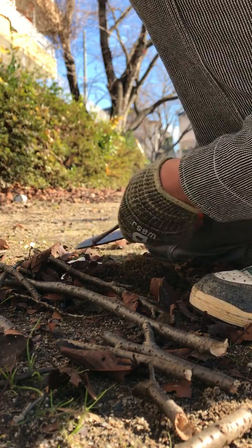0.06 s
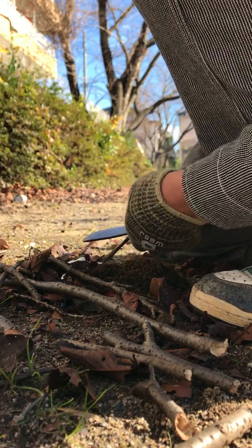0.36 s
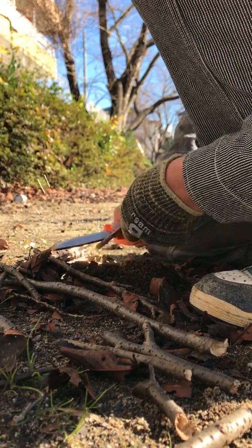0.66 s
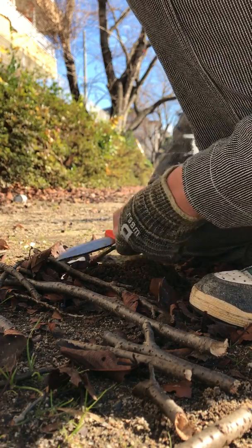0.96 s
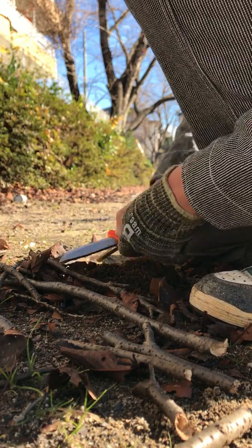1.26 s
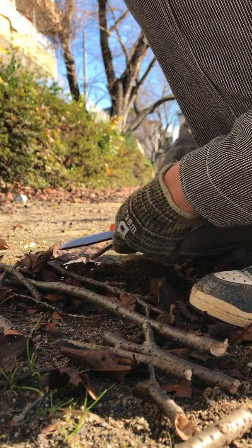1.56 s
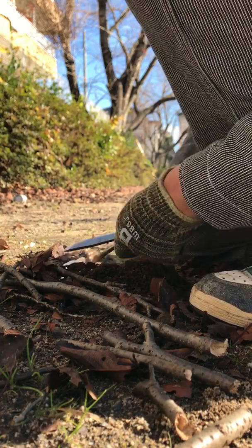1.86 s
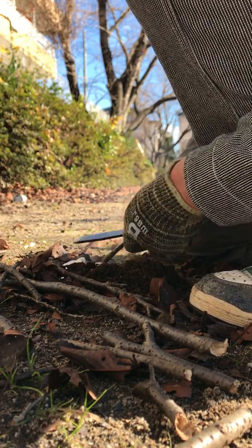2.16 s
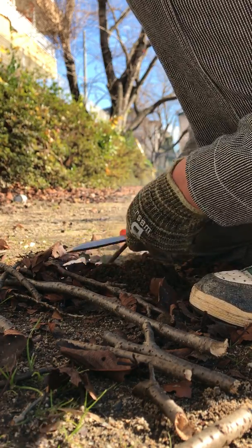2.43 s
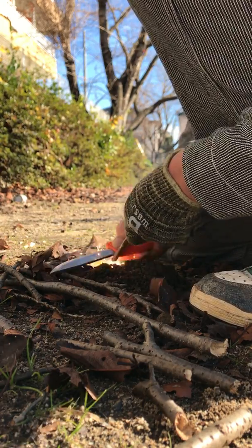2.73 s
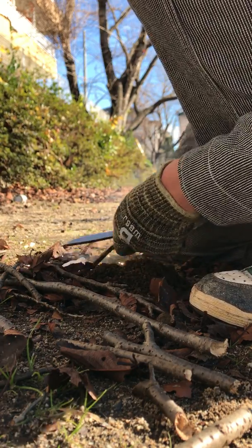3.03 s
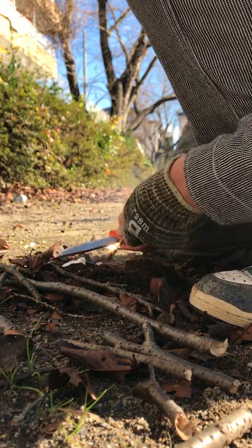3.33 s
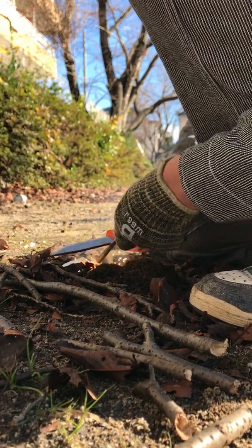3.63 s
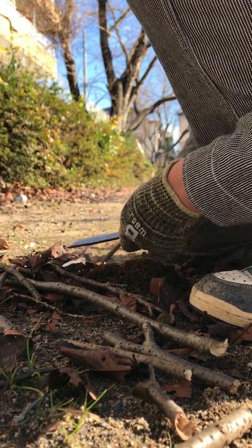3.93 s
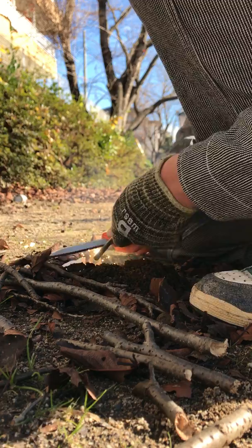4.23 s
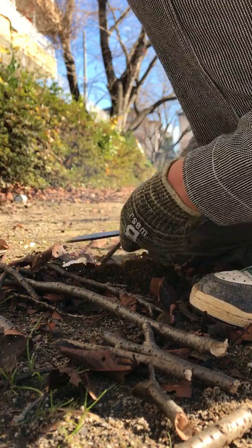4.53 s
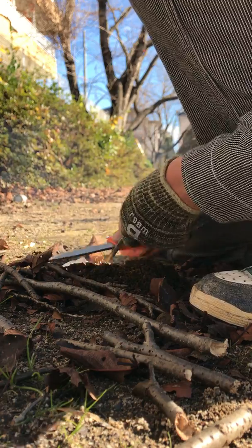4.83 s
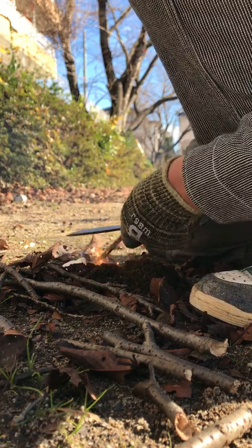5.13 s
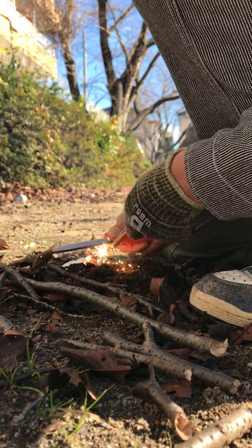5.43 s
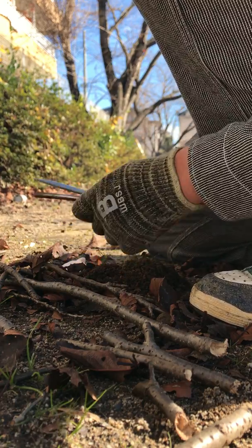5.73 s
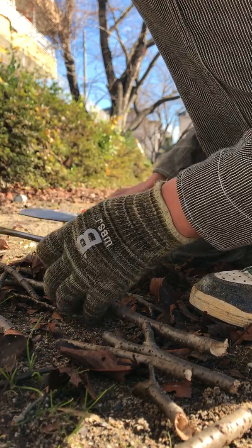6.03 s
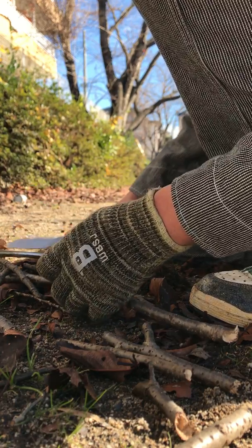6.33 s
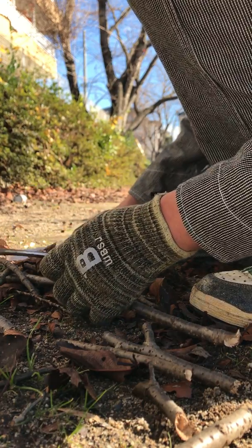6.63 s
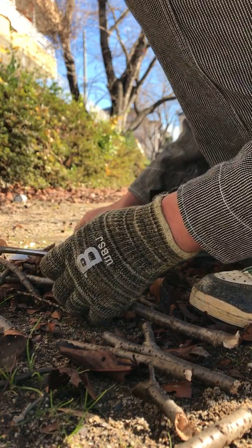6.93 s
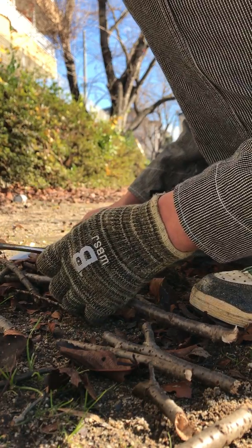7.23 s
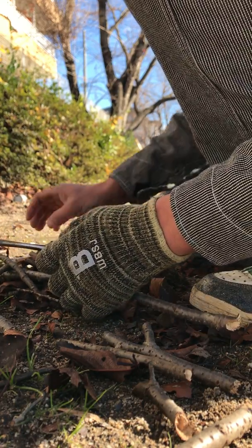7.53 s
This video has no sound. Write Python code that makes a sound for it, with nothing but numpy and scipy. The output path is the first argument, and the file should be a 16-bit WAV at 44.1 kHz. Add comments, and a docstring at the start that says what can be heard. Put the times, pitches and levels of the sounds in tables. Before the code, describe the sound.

Close, quick rasping strokes of a blade on a fire-starting rod click and fizz outdoors, followed by a glove softly shifting twigs.

```python
"""Outdoors on the ground, a knife scrapes a spark rod over tinder, close up, in strokes that quicken to five
a second. Each push judders onto the rod and rasps along it in a fizz of sparks; on each return the edge
bites with a short loud chatter and knocks to a stop. Then a gloved hand shifts dry leaves and twigs.
Behind it all lie a bed of low outdoor rumble and a faint far bird."""
import sys
import numpy as np
from scipy import signal
from scipy.fft import rfft, irfft, next_fast_len
from scipy.io import wavfile
from scipy.ndimage import uniform_filter1d, map_coordinates

SR = 44100
rng = np.random.default_rng(int(sys.argv[2]) if len(sys.argv) > 2 else 0)


def wav_record(signal):
    """Record a signal, one row per channel, as 16-bit PCM in the file named by sys.argv[1]."""
    frames = np.transpose(np.atleast_2d(signal))
    bounded = np.clip(frames, -1, 1)
    # unit amplitude maps onto the largest positive 16-bit level
    quanta = np.round(bounded * 32767).astype(np.int16)
    wavfile.write(sys.argv[1], SR, quanta)


N = 334278

# Fader ride of the outdoor drone: t/s, level/dB
DRONE_RIDE = [(0, -53.5), (.2, -46.5), (.6, -49.5), (.8, -46), (1.3, -47), (1.9, -51.5), (2.2, -45),
              (2.8, -48.5), (3.6, -51), (4.4, -52.5), (5.7, -53.5), (7, -53), (7.58, -58)]
# EQ curves of the outdoor bed: f/Hz, level/dB
DRONE_EQ = [(50, -25), (75, -4.5), (100, 1), (132, -3), (165, -10.5), (210, -11), (280, -24.5), (400, -24),
            (800, -76)]
RUMBLE_EQ = [(18, -42), (30, -21), (42, -1.5), (55, 3), (72, -9.5), (110, -15.5), (300, -15), (600, -50)]
AIR_EQ = [(150, -32.5), (300, -3), (450, -11.5), (700, -13), (1200, -15.5), (2400, -24), (4000, -26),
          (5500, -29), (7500, -32.5), (8500, -30.5), (10300, -39.5), (13000, -33), (16000, -40)]
# Reverb decay of hedge and trees: f/Hz, t60/s
GARDEN_DECAY = [(200, 0.11), (1500, 1), (6000, 0.55), (14000, 0.026)]

# The blade is pushed down the rod: t/s, length/s, rasp level/dB, fizz level/dB
PUSHES = [(-0.062, 0.14, -36, -42.5), (0.03, 0.15, -55, -71), (0.675, 0.14, -37.5, -41.5),
          (0.981, 0.09, -48, -60), (1.23, 0.13, -35.5, -40), (1.397, 0.12, -88, -69),
          (1.525, 0.13, -35, -38.5), (1.781, 0.13, -41.5, -50.5), (1.86, 0.078, -36, -40.5),
          (2.035, 0.13, -34.5, -40), (2.284, 0.14, -33, -41), (2.513, 0.13, -35.5, -41.5),
          (2.743, 0.132, -33, -40.5), (2.982, 0.12, -34, -39.5), (3.182, 0.14, -35, -41),
          (3.401, 0.13, -34.5, -40.5), (3.602, 0.16, -35, -41), (3.813, 0.13, -34.5, -43),
          (4.024, 0.12, -34.5, -42), (4.227, 0.13, -35.5, -44.5), (4.426, 0.13, -38, -45),
          (4.641, 0.12, -35.5, -42), (4.853, 0.087, -40, -49), (4.931, 0.016, -37, -38),
          (5.022, 0.2, -36.5, -41.5), (5.254, 0.17, -44.5, -43.5), (5.442, 0.19, -38, -40),
          (5.533, 0.21, -51.5, -55)]
# Swell of a push, a row each for rasp, hiss and fizz: power of speed, lateness of the peak
PUSH_SHAPES = [(1.13, 1.336), (1.58, 0.87), (1.67, 1.35)]
# The blade is drawn back to a stop: stop t/s, length/s, rasp level/dB, knock level/dB
RETURNS = [(0.8482, 0.067, -51, -21.5), (1.1607, 0.032, -43, -17), (1.413, 0.14, -39, -23),
           (1.6922, 0.055, -34, -12.5), (1.968, 0.055, -41, -15), (2.2228, 0.12, -41.5, -21.5),
           (2.4542, 0.053, -37.0, -14), (2.6912, 0.099, -41.5, -14.5), (2.9189, 0.083, -36.5, -11.5),
           (3.1497, 0.1, -41, -15), (3.354, 0.077, -40.5, -11.5), (3.567, 0.13, -42.5, -15.5),
           (3.7784, 0.069, -32.5, -15.5), (3.981, 0.059, -36.5, -16.5), (4.185, 0.068, -38.5, -12.5),
           (4.3858, 0.065, -39.5, -12), (4.5971, 0.064, -36.5, -11.5), (4.803, 0.081, -40.5, -14),
           (5.0166, 0.078, -34.5, -15.5), (5.2098, 0.048, -37, -14), (5.42, 0.17, -41.5, -8.5)]
# A larger shaving flares up: t/s, length/s, fizz level/dB
FLARES = [(1.592, 0.024, -38), (1.691, 0.037, -50), (2.895, .03, -49), (3.235, .035, -40),
          (4.082, .028, -37), (4.702, 0.025, -42), (5.135, .035, -39), (5.34, .025, -40),
          (5.673, 0.032, -56)]
# EQ curves of rasp, steel hiss and sparks: f/Hz, level/dB
RASP_EQ = [(60, -37), (130, 3), (200, 2.5), (280, 5), (430, -6), (620, 0), (1050, 2.5), (1900, 0),
           (2350, -3), (2900, 0), (3500, -9), (4200, -30), (7000, -33)]
HISS_EQ = [(2000, -20), (3600, -9), (4200, -5.5), (5300, 2.5), (6900, 1), (7800, -10.5), (9300, 0.5),
           (12000, -24), (16000, -23)]
SPARK_EQ = [(5000, -24.5), (8000, -0.5), (9300, -3), (10300, -3), (12000, 4), (13500, -2), (16000, -3.5)]
# Resonances of the scraped rod: f/Hz, width/Hz, level/dB
ROD_MODES = [(4293, 700, 0.5), (5430, 380, -3.5), (6260, 560, -2), (7040, 450, 4.5), (11630, 620, -2),
             (12800, 510, 0)]

# The blade is set against the rod: t/s, level/dB, rod pitch ratio, relative splash level/dB
TAPS = [(0.0802, -9.5, 0.77, -3), (0.228, -42, 1.07, -4), (0.2333, -43, 0.975, -1), (0.309, -42.5, 1.2, 1),
        (.4477, -9.5, 1.01, -11), (2.259, -45, 1.2, 6), (5.229, -42, 1, -3)]
# Resonances of the tapped rod and blade: f/Hz, width/Hz, level/dB
TAP_ROD_MODES = [(1240, 308, -5.5), (4230, 180, -2.5)]
TAP_BLADE_MODES = [(5880, 273, 3), (6160, 420, -1), (7040, 300, -2.5), (9200, 760, -12)]
# Partials of the free blade tip: f/Hz, level/dB
TIP_PARTIALS = [(2650, 6), (3200, 5), (8400, -0.5)]

# The edge skips as it settles on the rod: t/s, length/s, level/dB, lowest resonance f/Hz
JUDDERS = [(0.713, 0.02, -42, 703), (1.561, 0.019, -49, 515), (2.075, 0.024, -44, 526),
           (2.326, 0.026, -48, 485), (2.552, 0.019, -40, 537), (2.782, 0.023, -35.5, 619.6),
           (3.015, 0.03, -36, 607), (3.226, 0.029, -36, 593), (3.436, 0.034, -34, 619),
           (3.651, 0.027, -34.5, 596), (3.855, 0.029, -34.5, 606), (4.063, 0.03, -34, 589),
           (4.263, .027, -35.5, 595), (4.47, 0.021, -33, 635), (4.679, 0.025, -30, 690),
           (4.892, 0.029, -36, 522), (5.09, 0.037, -35.5, 575), (5.304, 0.031, -39.5, 444),
           (5.506, 0.029, -37.5, 482)]
# The rod's sliding ring: multiple of the lowest resonance, level/dB
ROD_PARTIALS = [(1, 2), (1.85, 4.5), (3.4, -3.5), (4.5, -1)]
# Resonances in the grain of a judder: f/Hz, width/Hz, level/dB
JUDDER_MODES = [(1050, 250, 3), (2110, 520, 3), (2600, 270, -10), (5070, 380, -5), (6900, 700, 0)]

# The edge digs into the rod: t/s, length/s, chatter level/dB, drag level/dB
BITES = [(0.813, 0.023, -49, -37.5), (1.668, 0.02, -40.5, -47), (1.953, 0.0139, -39.5, -49),
         (2.173, 0.028, -44.5, -39.5), (2.433, 0.01, -27.5, -31), (2.665, 0.012, -33.5, -29),
         (2.896, 0.011, -32, -29), (3.126, 0.01196, -23.5, -29.5), (3.331, 0.012, -22, -30.5),
         (3.543, 0.011, -22.5, -27.5), (3.746, 0.02, -49, -50), (3.959, 0.01, -19.5, -34.5),
         (4.161, 0.0119, -19.5, -30.5), (4.363, 0.014, -20.5, -30.5), (4.574, 0.011, -20.5, -27.5),
         (4.779, 0.011, -21.5, -24), (4.98, 0.029, -54, -43), (5.17, 0.026, -40, -31),
         (5.398, 0.0098, -24, -26)]
# Resonances of a bite's bright chatter and dull drag: f/Hz, width/Hz, level/dB
CHATTER_MODES = [(712.6, 15.8, 6.5), (1235, 64, 4.5), (1990, 220, -4), (2687, 170, -3.5),
                 (3120, 270, -16.5), (4470, 190, -9), (5130, 240, -7.5), (6032, 480, -10),
                 (6680, 220, -6.5), (9210, 1200, -30), (12500, 2620, -25)]
DRAG_MODES = [(766, 26, 11.5), (1164, 340, 16), (2030, 430, -12), (2730, 310, -30)]
CATCH_LEAD_S = .0063  # the edge catches just ahead of each bite

# The edge snags in mid-stroke: t/s, level/dB
SNAGS = [(1.3899, -28), (1.6784, -21), (2.8023, -17.5), (3.2453, -18.5), (3.4595, -18), (3.672, -18),
         (3.744, -18), (3.7559, -16), (3.7602, -18.5), (3.8787, -20), (4.0833, -17), (4.285, -16.5),
         (4.4892, -16), (4.6979, -14)]
# Resonances of the dull knock (retuned per hit) and its steel tick: f/Hz, width/Hz, level/dB
KNOCK_MODES = [(1056, 280, 13), (1500, 420, 3.5), (2270, 1000, -12), (2690, 490, -38)]
TICK_MODES = [(4360, 1300, -13), (5300, 960, -4), (6290, 650, 0), (9000, 1200, -6), (11700, 1230, -12)]

# Calls of the far bird: t/s, level/dB
CHIRPS = [(5.85, -63), (6.735, -64), (7.11, -70), (7.36, -60)]
# The glove brushes the tinder: middle t/s, length/s, rub level/dB, crinkle level/dB
BRUSHES = [(5.933, 0.15, -66.5, -71), (6.336, 0.38, -60.5, -66), (6.356, 0.086, -52, -62),
           (6.53, 0.12, -59.5, -60), (6.682, 0.11, -67, -69), (6.856, .24, -68, -67),
           (7.04, 0.043, -66, -75), (7.268, 0.096, -61.5, -65.5), (7.36, .045, -56, -60),
           (7.507, 0.34, -62, -65)]
# EQ curves of glove rub and leaf crinkle: f/Hz, level/dB
GLOVE_EQ = [(500, -9), (1200, 0), (2000, 0), (3200, -3), (4200, -2.5), (5400, 0.5), (6500, -2.5),
            (8000, -11.5), (12000, -21)]
LEAF_EQ = [(2000, -15.5), (5500, -8), (7500, -4), (9200, 3.5), (10400, -0.5), (12800, 4), (16000, -4)]
# Twigs and leaves snap under the glove: t/s, level/dB, f/Hz
SNAPS = [(6.2911, -55.5, 3960), (6.4752, -37.5, 3700), (6.5272, -39, 12800), (6.6057, -44, 5500),
         (6.6366, -41, 5310), (6.67, -39, 5520), (6.8044, -48, 5640), (6.9237, -48, 5980),
         (6.9739, -43, 9200), (7.0274, -45, 5600), (7.3479, -34.5, 5560), (7.363, -38, 2800),
         (7.466, -39, 3310), (7.5084, -45, 8520), (7.5434, -36.5, 7450)]


def amp(db):
    """Decibels to gain."""
    return 10 ** (np.asarray(db) / 20)


def unit(x):
    """Normalise to rms 1."""
    return x / np.sqrt(np.mean(x ** 2) + 1e-20)


def crest(x):
    """Normalise to peak 1."""
    return x / (np.abs(x).max() + 1e-20)


def clock(seconds):
    """Sample times of a stretch."""
    return np.arange(int(seconds * SR)) / SR


def noise(shape):
    """White noise."""
    return rng.standard_normal(shape)


def sine(hz, phase=0):
    """Oscillator that follows a pitch curve; phase in cycles."""
    return np.sin(2 * np.pi * (phase + np.cumsum(hz) / SR))


def along(points, hz):
    """Read (f, value) points on a log frequency axis."""
    f, value = np.transpose(points)
    return np.interp(np.log(hz + 1), np.log(f + 1), value)


def wobble(rate):
    """Smooth random modulation, rate knots a second."""
    return map_coordinates(noise(int(N * rate / SR) + 4), [np.arange(N) * rate / SR])


def filtered(x, response):
    """Filter x by a function of frequency."""
    size = next_fast_len(len(x) + 4096)
    return irfft(rfft(x, size) * response(np.fft.rfftfreq(size, 1 / SR)), size)[:len(x)]


def coloured(x, eq):
    """x through an EQ curve, at rms 1."""
    return unit(filtered(x, lambda hz: amp(along(eq, hz))))


def ring(x, modes, ratio=1):
    """x through a resonator bank, transposed by a ratio."""
    return filtered(x, lambda f: sum(
        amp(db) * 1j * f * width / ((hz * ratio) ** 2 - f * f + 1j * f * width)
        for hz, width, db in modes))


def radiated(x, low_hz, high_hz):
    """Band-pass: a small body radiates little bass, and a soft contact little treble."""
    def response(f):
        low_cut = (1j * f / low_hz) ** 2 / (1 + 1j * f / low_hz - (f / low_hz) ** 2)
        return low_cut / (1 + 1.4j * f / high_hz - (f / high_hz) ** 2)
    return filtered(x, response)


def add(track, s, x):
    """Mix x into the track at time s."""
    start = max(round(s * SR), 0)
    part = track[start:start + len(x)]
    part += x[:len(part)]


def grit(rate, spread_db, smooth):
    """Tiny fractures of uneven size, rate a second, over smooth noise."""
    cracks = (rng.random(N) < rate / SR) * rng.choice([-1, 1], N)
    sizes = amp(spread_db * np.clip(noise(N), -2, 2))
    return unit(unit(cracks * sizes) + smooth * noise(N))


def slips(t, rate, scatter, spread_db, dust):
    """Stick and slip: one kick per release at an uneven rate, with crumbling between."""
    jitter = np.repeat(noise(len(t)), 32)[:len(t)]
    cycles = np.cumsum(rate * np.exp(scatter * jitter)) / SR
    kicks = np.diff(np.floor(cycles), prepend=0) * amp(spread_db * np.clip(noise(len(t)), -2, 2))
    return unit(kicks) + dust * noise(len(t))


def glide(x, ratio):
    """Varispeed: resonances slide as the contact point moves along the rod."""
    return map_coordinates(x, [np.cumsum(ratio)])


def blow(t, crumble, decay_s):
    """A hard transient with a short crumbling tail."""
    return (t == 0) + crumble * noise(len(t)) * np.exp(-t / decay_s)


def swing(start, length, lateness=1):
    """Speed of one hand movement, 0 to 1 and back; lateness over 1 delays the peak."""
    speed = np.abs(np.sin(np.pi * (clock(length) / length) ** lateness))
    return speed[max(-round(start * SR), 0):]


def outdoors(rumble_db=-56, rumble_follows=0.26, air_db=-61):
    """The bed: a wavering drone that slowly recedes, a deep rumble that partly follows it, soft air."""
    level = np.interp(np.arange(N) / SR, *np.transpose(DRONE_RIDE))
    drone = amp(level + wobble(6)) * coloured(noise(N), DRONE_EQ)
    rumble_ride = rumble_db + rumble_follows * (level - level.mean())
    rumble = amp(rumble_ride + wobble(2.9)) * coloured(noise(N), RUMBLE_EQ)
    air = amp(air_db + 0.22 * wobble(1.7)) * coloured(noise(N), AIR_EQ)
    return drone + rumble + air


def stroke_envelopes(firm_rasp_db=-34.5, firm_hiss_db=-41.5, let_up_s=0.0073, release_db_per_s=442):
    """Gains of rasp, hiss and fizz ride the blade's speed in each push and return; flares add fizz."""
    power = np.zeros((3, N))
    for s, length, rasp_db, fizz_db in PUSHES:
        hiss_db = firm_hiss_db + 0.47 * (rasp_db - firm_rasp_db)
        for track, db, (growth, lateness) in zip(power, (rasp_db, hiss_db, fizz_db), PUSH_SHAPES):
            add(track, s, (amp(db) * swing(s, length, lateness) ** growth) ** 2)
    for s, length, db in FLARES:
        add(power[2], s, (amp(db) * swing(s, length)) ** 2)
    for stop, length, rasp_db, _ in RETURNS:
        t = clock(length + .1)
        pressed = length - let_up_s  # pressure lets up just before the stop
        swell = np.sin(np.pi / 2 * np.clip(t / pressed, 0, 1)) ** 0.64
        release = amp(-release_db_per_s * np.maximum(t - pressed, 0))
        for track, trim_db in zip(power, (0, -8.5, -15.5)):  # drawing back strikes few sparks
            add(track, stop - length, (amp(rasp_db + trim_db) * swell * release) ** 2)
    return np.sqrt(power)


def sputter(x, patchy_db=2.4):
    """Each shaving burns with its own colour for a few hundredths of a second."""
    spectrum = signal.stft(x, nperseg=256)[2]
    patches = uniform_filter1d(noise(spectrum.shape), size=9, axis=0)
    patches = uniform_filter1d(patches, size=8, axis=1)
    return unit(signal.istft(spectrum * amp(patchy_db * unit(patches)), nperseg=256)[1][:N])


def contact(duck=0.39):
    """Gain of steady rubbing: it ducks while the edge skips."""
    gain = np.ones(N)
    for s, length, _, _ in JUDDERS:
        add(gain, s, -duck * np.abs(np.sin(np.pi * clock(length) / length)) ** .5)
    return gain


def scraping(rasp_db=-3.5, hiss_db=-0.5, fizz_db=2, crackle_db=-9, glow_s=.035):
    """The edge shaves the rod: grainy rasp, steely hiss, and the fizz and crackle of burning shavings."""
    rasp_gain, hiss_gain, fizz_gain = stroke_envelopes() * amp(1.7 * wobble(130))
    rasp = coloured(grit(rate=1500, spread_db=4.5, smooth=0.596), RASP_EQ)
    rasp *= amp(rasp_db + 2 * wobble(300)) * contact()
    hiss = coloured(grit(rate=3500, spread_db=5.5, smooth=0.764), HISS_EQ)
    hiss += amp(-3) * unit(ring(grit(rate=3600, spread_db=4, smooth=0.63), ROD_MODES))
    fizz = coloured(grit(rate=3500, spread_db=6, smooth=0.95), SPARK_EQ)
    hiss = amp(hiss_db) * sputter(hiss)
    fizz = amp(fizz_db) * sputter(fizz)
    # sparks keep popping for a moment after they have left the blade
    glow = signal.lfilter([1], [1, -np.exp(-1 / (glow_s * SR))], fizz_gain) / (glow_s * SR)
    pops = unit(radiated(grit(rate=110, spread_db=5, smooth=0), low_hz=4500, high_hz=15000))
    return rasp_gain * rasp + hiss_gain * hiss + fizz_gain * fizz + glow * pops * amp(crackle_db)


def garden(x, near_db=-21, far_db=-33):
    """Reverb: ground and legs scatter the sound at once; hedge and trees add a weak tail."""
    hz, frame_s, spectrum = signal.stft(noise(SR // 2), SR, nperseg=256)
    decay = amp(-60 * frame_s / along(GARDEN_DECAY, hz)[:, None])
    tail = signal.istft(spectrum * decay, SR, nperseg=256)[1]
    t = np.arange(len(tail)) / SR
    near = filtered(noise(len(t)) * (t > .001) * np.exp(-t / 0.004), lambda f: 1 / (1 + f / 6000))
    impulse = amp(near_db) * near / np.linalg.norm(near) + amp(far_db) * tail / np.linalg.norm(tail)
    return signal.fftconvolve(x, impulse)[:N]


def taps(attack_s=0.00036):
    """The blade clicks onto the rod, whose pitch depends on where it is touched; the grip chokes both."""
    out, t = np.zeros(N), clock(.04)
    attack = 1 - np.exp(-(t / attack_s) ** 2)
    for s, db, ratio, splash_db in TAPS:
        rod = [(hz * ratio, width, level) for hz, width, level in TAP_ROD_MODES]
        steel = sum(amp(level) * width * np.exp(-np.pi * width * t) * np.sin(2 * np.pi * hz * t)
                    for hz, width, level in rod + list(TAP_BLADE_MODES))
        splash = radiated(noise(len(t)) * np.exp(-t / 0.00118), low_hz=2460, high_hz=12700)
        add(out, s, amp(db) * (crest(steel * attack) + amp(splash_db) * crest(splash)))
    return out


def blade_ring(trim_db=-67, t60_s=1.0):
    """After each tap the free tip of the blade rings on very faintly."""
    out, t = np.zeros(N), clock(.5)
    for s, db, _, _ in TAPS:
        tones = sum(amp(level) * sine(hz + 250 * noise(len(t))) for hz, level in TIP_PARTIALS)
        add(out, s, amp(db + trim_db - 60 * t / t60_s) * tones)
    return out


def squeal(start_s=.712, length_s=.024, pitch_hz=708, level_db=-40, rise=.2, waver=.03):
    """On one slow push the edge sings briefly on the rod's lowest resonance."""
    out, t = np.zeros(N), clock(length_s)
    flutter = unit(uniform_filter1d(noise(len(t)), size=64))
    hz = pitch_hz * (1 + rise * (t / length_s - .5)) * (1 + waver * flutter)
    add(out, start_s, amp(level_db) * unit(np.sin(np.pi * t / length_s) * sine(hz)))
    return out


def judders(rise=.38, waver=.085, grain_db=-5):
    """The blade skips along the rod, whose short zing bends up with the moving contact."""
    out = np.zeros(N)
    for s, length, db, hz in JUDDERS:
        t = clock(length)
        pitch = hz * (1 + rise * (t / length - .5))
        # uneven skips roughen each partial
        flutters = uniform_filter1d(noise((len(ROD_PARTIALS), len(t))), size=64, axis=1)
        zing = sum(amp(level) * sine(multiple * pitch * (1 + waver * unit(flutter)), rng.random())
                   for (multiple, level), flutter in zip(ROD_PARTIALS, flutters))
        skips = slips(t, rate=1100, scatter=0.77, spread_db=5.5, dust=0.34)
        grain = radiated(ring(skips, JUDDER_MODES), low_hz=500, high_hz=8980)
        swell = np.abs(np.sin(np.pi * t / length)) ** .5
        add(out, s, amp(db) * swell * (unit(zing) + amp(grain_db) * unit(grain)))
    return out


def squeaks(length_s=.014, pitch_hz=1323, fall=0.48, waver=.11, detune=.07, trim_db=-5.5):
    """As the edge catches, the rod rings briefly and bends down with the closing contact."""
    out, t = np.zeros(N), clock(length_s)
    sweep_hz = pitch_hz * (1 - fall * (t / length_s - .5))
    swell = np.sin(np.pi * t / length_s)
    for s, _, _, drag_db in BITES:
        flutter = unit(uniform_filter1d(noise(len(t)), size=48))
        hz = sweep_hz * (1 + waver * flutter + detune * rng.standard_normal())
        squeak = unit(swell * sine(hz, rng.random()))
        add(out, s - CATCH_LEAD_S - length_s / 2, amp(drag_db + trim_db) * squeak)
    return out


def bites(lead_s=0.011, edge_s=.0008, chatter_fall=0.0593, drag_fall=.22, drag_trim_db=-2):
    """The edge digs in: bright chatter inside a dull drag, both bending down as the blade runs out."""
    out = np.zeros(N)
    for s, length, chatter_db, drag_db in BITES:
        t = clock(length + 2 * lead_s)
        gate = (1 + np.tanh((t - lead_s) / edge_s)) * (1 - np.tanh((t - lead_s - length) / edge_s)) / 4
        place = np.tanh((t - lead_s - length / 2) / (lead_s + length / 2))  # along the rod, 0 mid-bite
        fast_slips = slips(t, rate=1700, scatter=.7, spread_db=2.2, dust=.45)
        chatter = radiated(ring(fast_slips, CHATTER_MODES), low_hz=577, high_hz=9700)
        chatter = glide(chatter, 1 - chatter_fall * place) * gate
        chatter /= np.sqrt(np.sum(chatter ** 2) / np.sum(gate ** 2))  # rms 1 while the gate is open
        slow_slips = slips(t, rate=700, scatter=.8, spread_db=3, dust=0.12)
        drag = radiated(ring(slow_slips, DRAG_MODES), low_hz=670, high_hz=6160)
        drag = unit(glide(drag, 1 - drag_fall * place)) * np.abs(np.sin(np.pi * t / t[-1])) ** .5
        add(out, s - lead_s, amp(chatter_db) * chatter + amp(drag_db + drag_trim_db) * drag)
    return out


def knocks(snag_hz=1140, catch_hz=1290, stop_hz=1070, hard_bite_db=-23, trim_db=-1):
    """Hand-damped steel snags, catches before a bite or ends a return: a dull knock and a bright tick."""
    # hits: t/s, level/dB, f/Hz, relative tick level/dB
    hits = [(s, db, snag_hz, -14) for s, db in SNAGS]
    hits += [(s - CATCH_LEAD_S, -14 + 0.97 * (db - hard_bite_db), catch_hz, -4) for s, _, db, _ in BITES]
    hits += [(s, db, stop_hz, -16) for s, _, _, db in RETURNS]
    out, t = np.zeros(N), clock(0.032)
    for s, db, hz, tick_db in hits:
        knock = ring(blow(t, crumble=0.086, decay_s=0.0017), KNOCK_MODES, hz / KNOCK_MODES[0][0])
        knock = crest(radiated(knock, low_hz=596, high_hz=5400))
        tick = ring(blow(t, crumble=0.46, decay_s=0.0022), TICK_MODES)
        tick = crest(radiated(tick, low_hz=1980, high_hz=11900))
        add(out, s, amp(db + trim_db) * (knock + amp(tick_db) * tick))
    return out


def bird(pitch_hz=5200, length_s=0.037, fall=0.027, waver_hz=200):
    """Thin, slightly falling contact calls from the trees."""
    out, t = np.zeros(N), clock(length_s)
    for s, db in CHIRPS:
        hz = pitch_hz * (1 - fall * (t / length_s - .5)) + waver_hz * noise(len(t))
        add(out, s, amp(db) * np.sin(np.pi * t / length_s) * sine(hz))
    return out


def brush_envelopes(speed_power=1.23):
    """Gains of glove rub and leaf crinkle ride the hand's speed."""
    power = np.zeros((2, N))
    for middle, length, *levels in BRUSHES:
        start = middle - length / 2
        for track, db in zip(power, levels):
            add(track, start, (amp(db) * swing(start, length) ** speed_power) ** 2)
    return np.sqrt(power)


def tinder(snap_trim_db=-2):
    """The glove brushes over twigs, dry leaves crinkle under it and small twigs snap."""
    rub_gain, crinkle_gain = brush_envelopes() * amp(1.5 * wobble(90))
    out = rub_gain * coloured(grit(rate=900, spread_db=4.5, smooth=0.69), GLOVE_EQ)
    out += crinkle_gain * coloured(grit(rate=300, spread_db=9.5, smooth=0.64), LEAF_EQ)
    t = clock(.02)
    for s, db, hz in SNAPS:
        crack = ring(blow(t, crumble=0.46, decay_s=0.0022), [(hz, 1200, 0), (11500, 6000, -12)])
        add(out, s, amp(db + snap_trim_db) * crest(crack))
    return out


def scene():
    """Mono mix: knife and tinder up front with a touch of reverb, bird and outdoor bed behind."""
    knife = scraping() + bites() + squeaks() + squeal() + judders() + knocks() + taps() + blade_ring()
    close = knife + tinder()
    return (close + garden(close) + bird() + outdoors())[None]


def record(dry, top_hz=16100, slope_hz=150):
    """A steep high cut takes off the very top of the mix."""
    def high_cut(hz):
        return (1 - np.tanh((hz - top_hz + slope_hz) / slope_hz)) / 2
    return np.array([filtered(channel, high_cut) for channel in dry])


dry = scene()
out = record(dry)
wav_record(out)
```